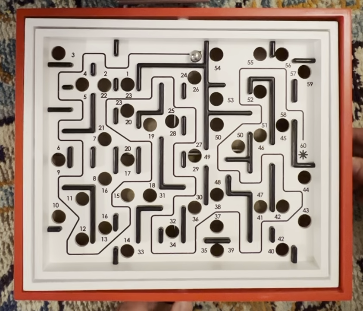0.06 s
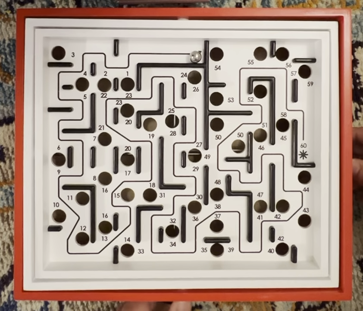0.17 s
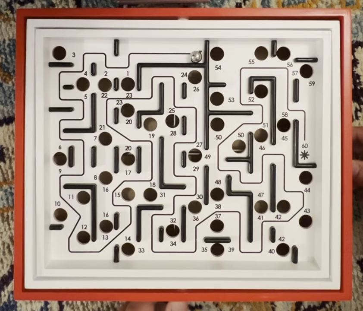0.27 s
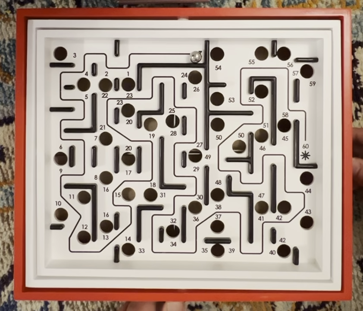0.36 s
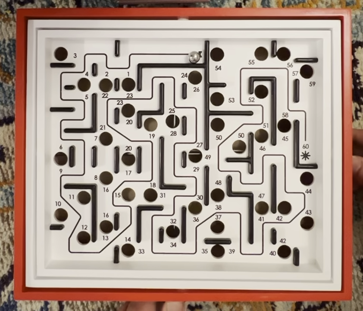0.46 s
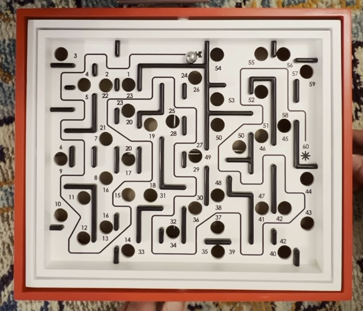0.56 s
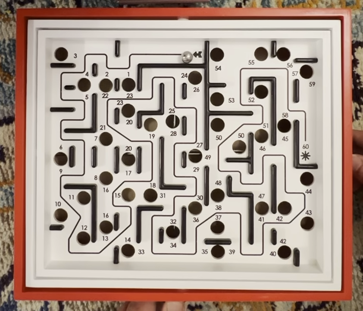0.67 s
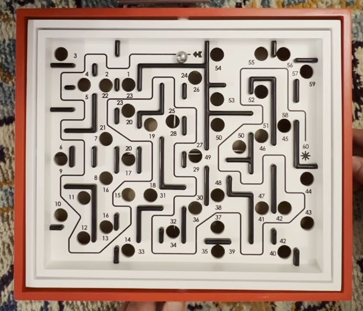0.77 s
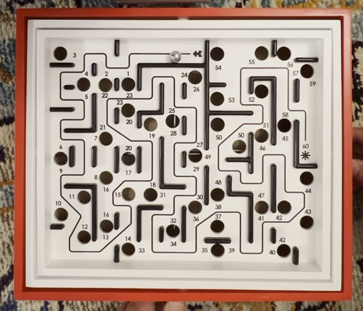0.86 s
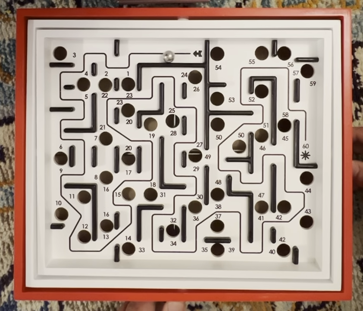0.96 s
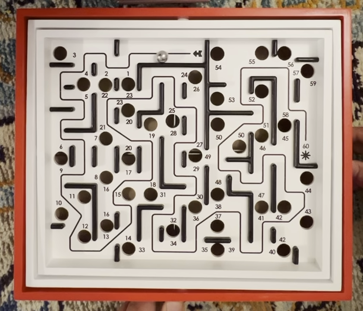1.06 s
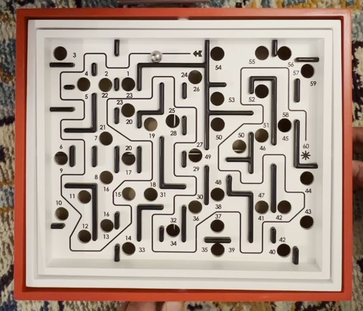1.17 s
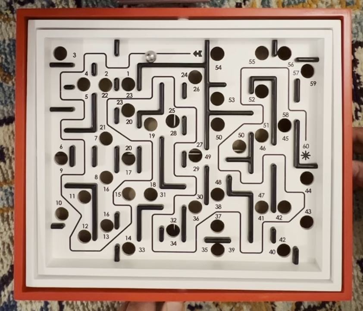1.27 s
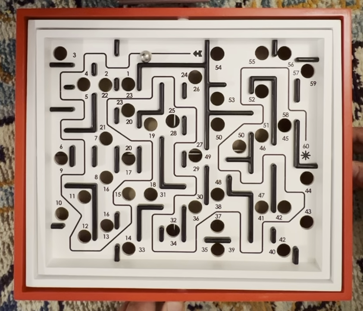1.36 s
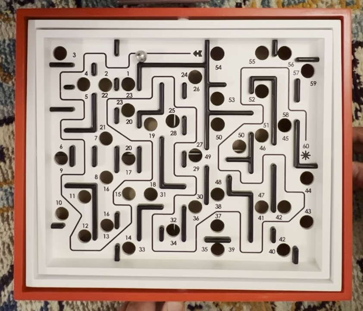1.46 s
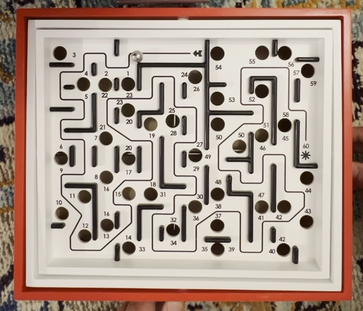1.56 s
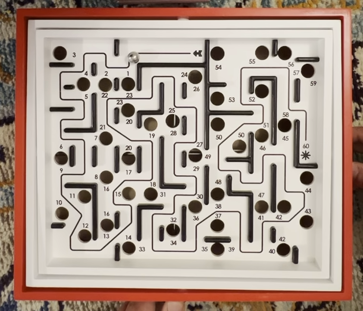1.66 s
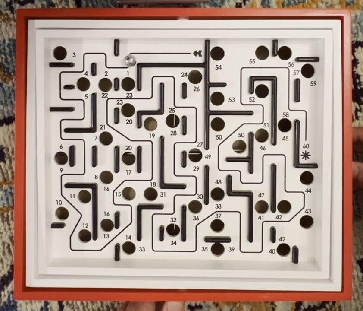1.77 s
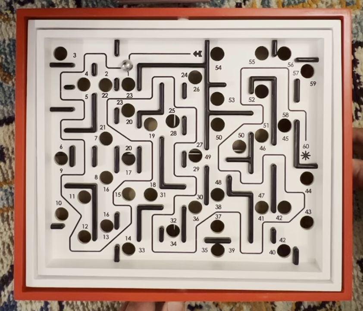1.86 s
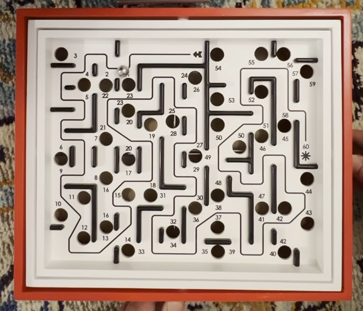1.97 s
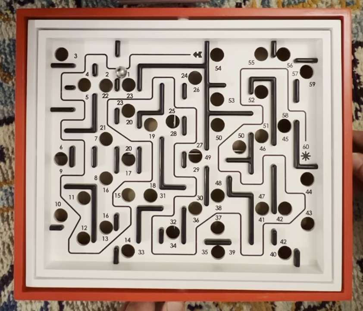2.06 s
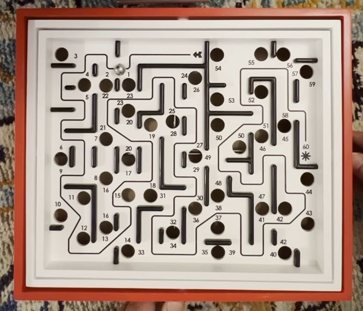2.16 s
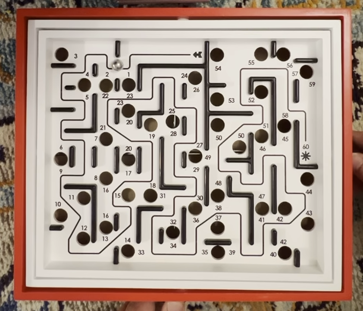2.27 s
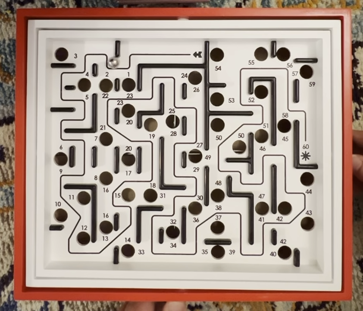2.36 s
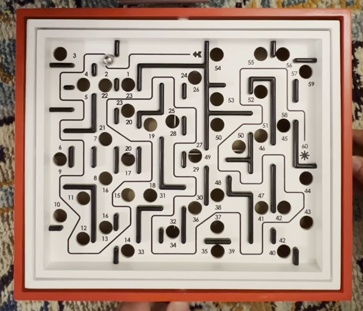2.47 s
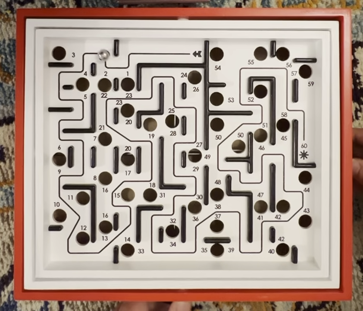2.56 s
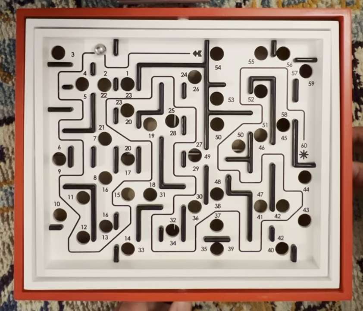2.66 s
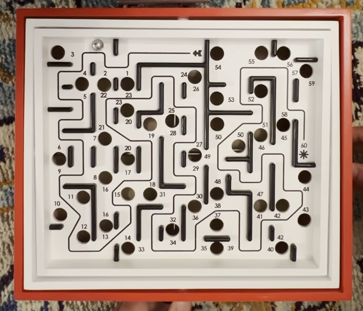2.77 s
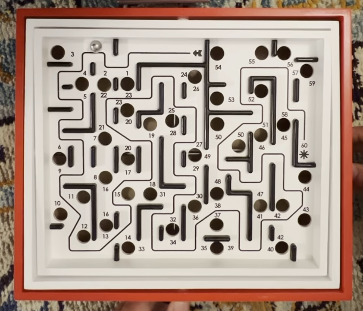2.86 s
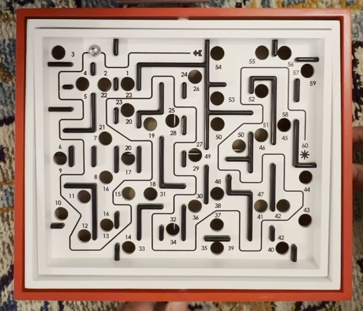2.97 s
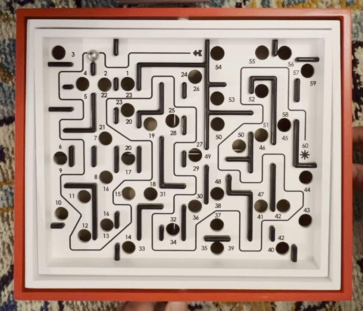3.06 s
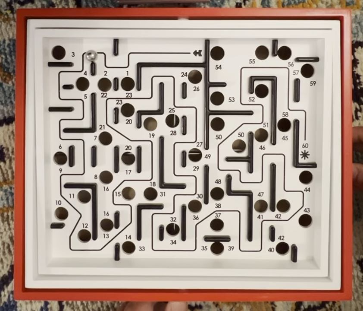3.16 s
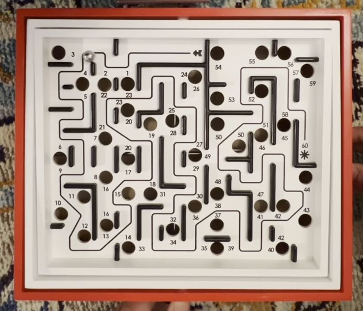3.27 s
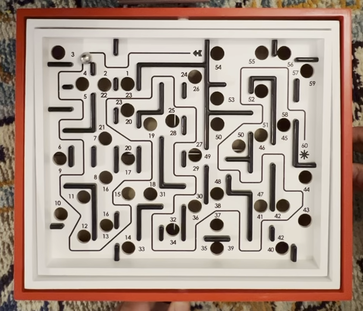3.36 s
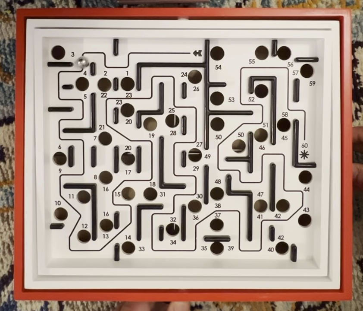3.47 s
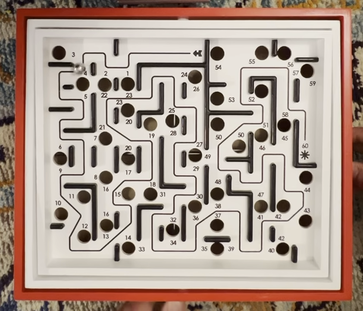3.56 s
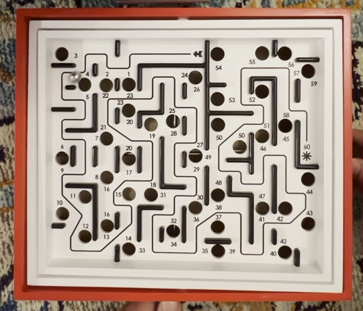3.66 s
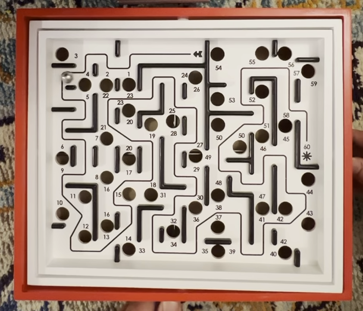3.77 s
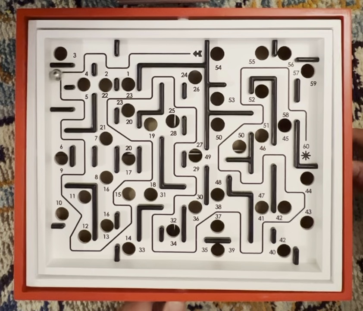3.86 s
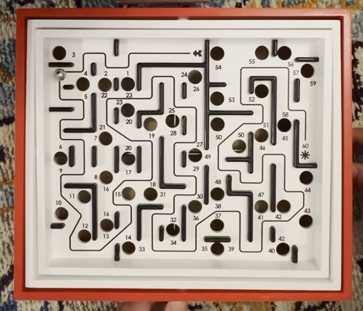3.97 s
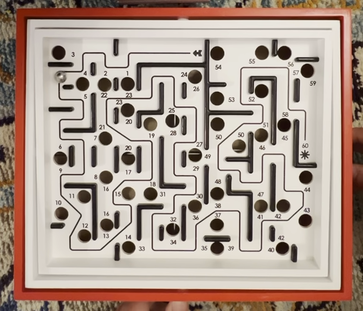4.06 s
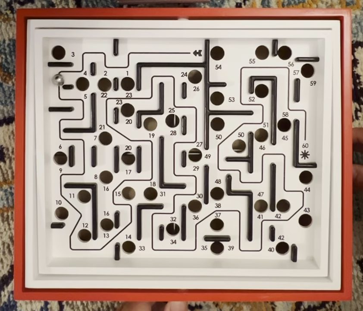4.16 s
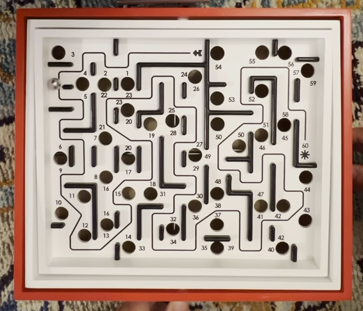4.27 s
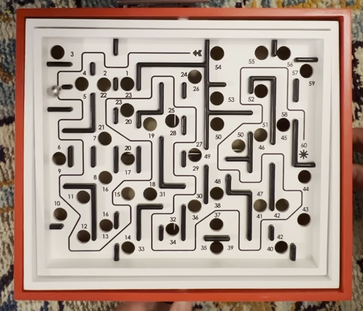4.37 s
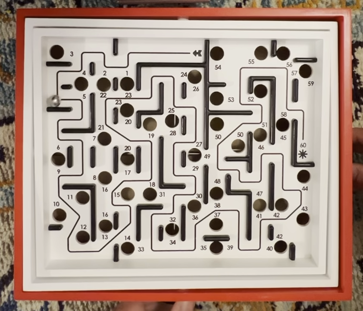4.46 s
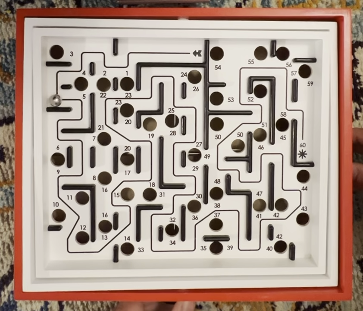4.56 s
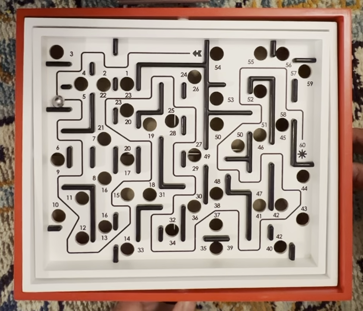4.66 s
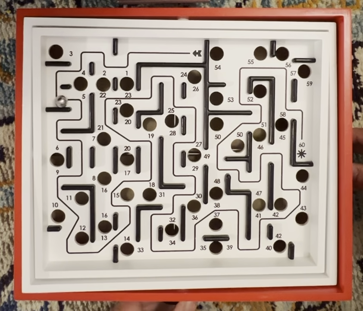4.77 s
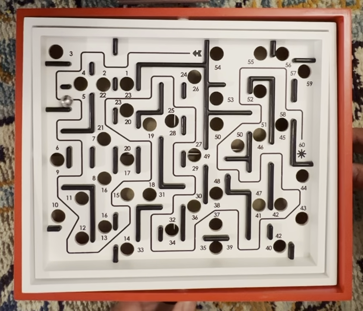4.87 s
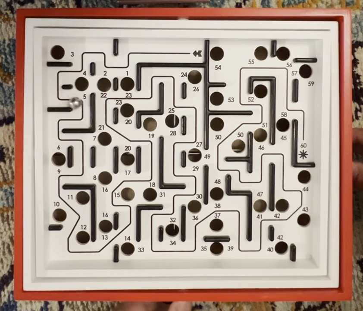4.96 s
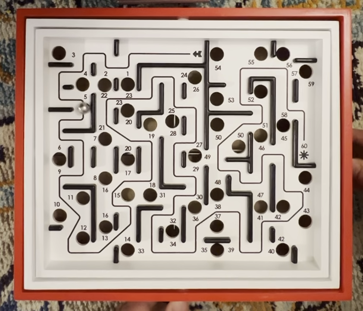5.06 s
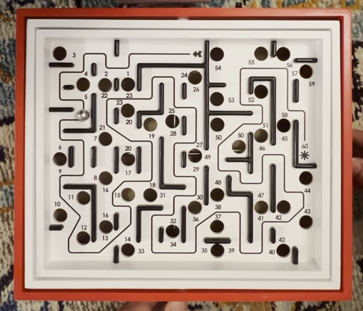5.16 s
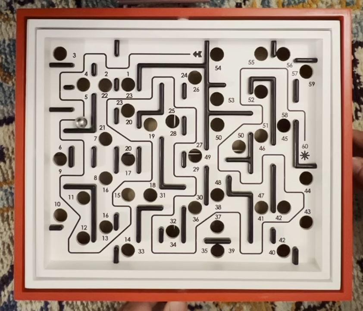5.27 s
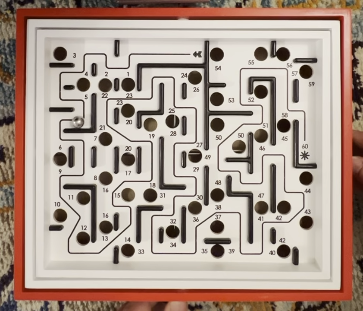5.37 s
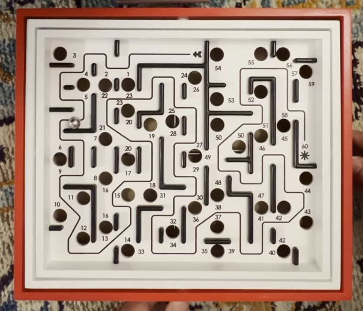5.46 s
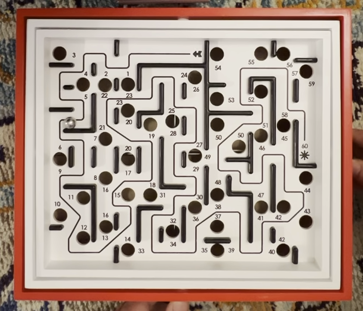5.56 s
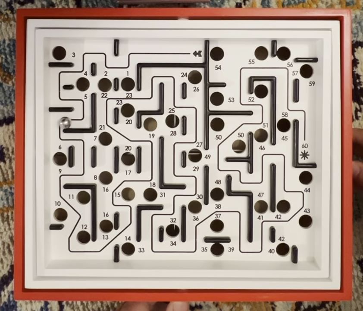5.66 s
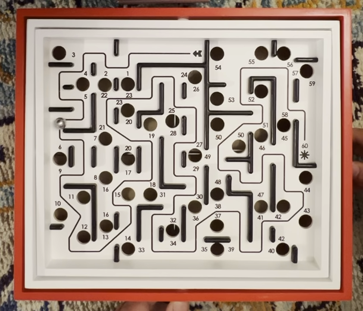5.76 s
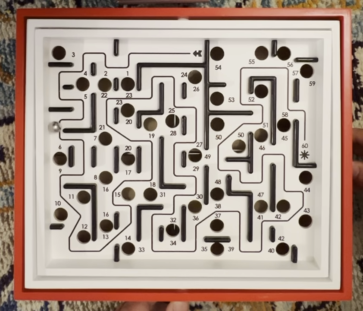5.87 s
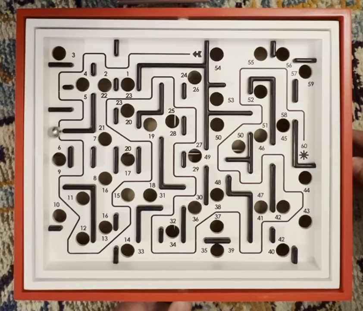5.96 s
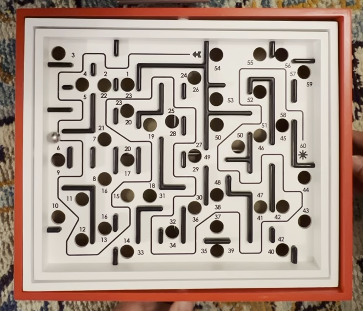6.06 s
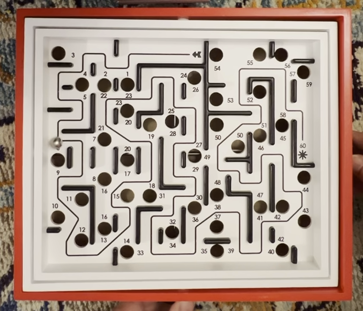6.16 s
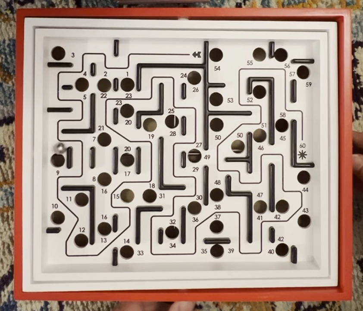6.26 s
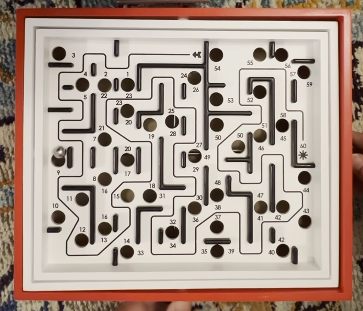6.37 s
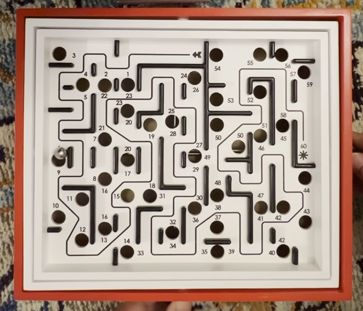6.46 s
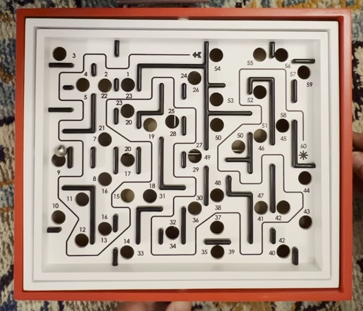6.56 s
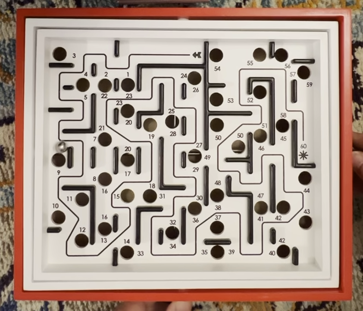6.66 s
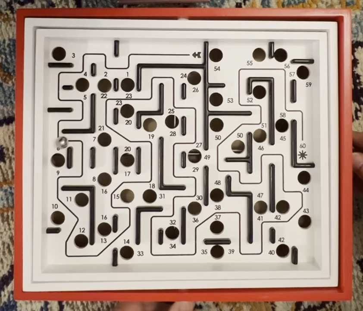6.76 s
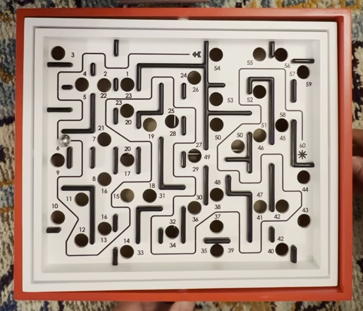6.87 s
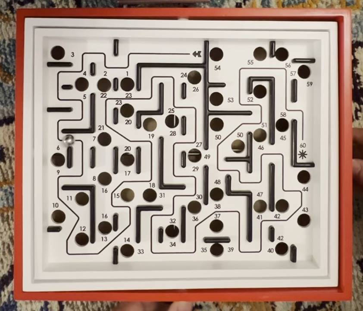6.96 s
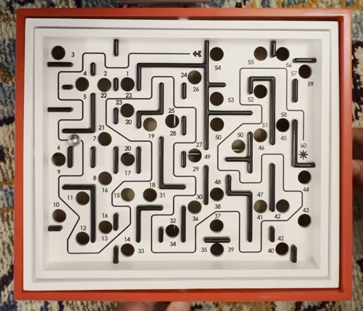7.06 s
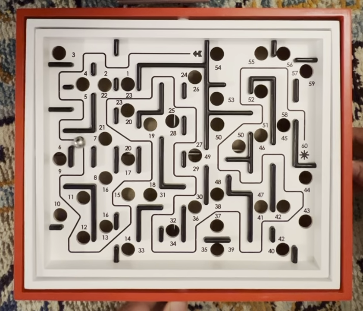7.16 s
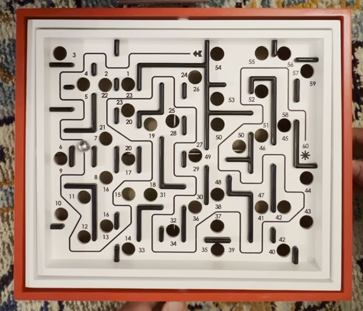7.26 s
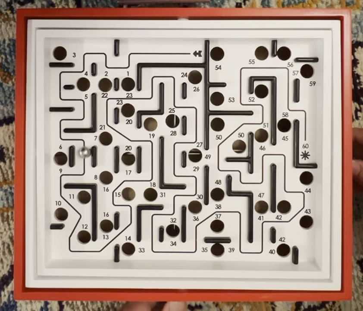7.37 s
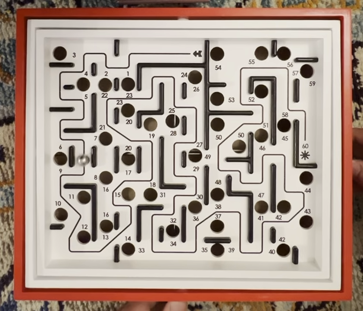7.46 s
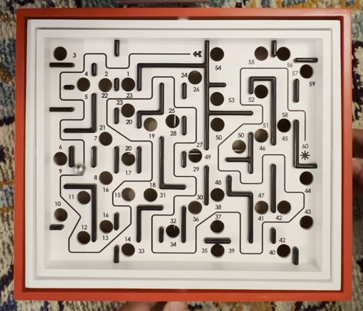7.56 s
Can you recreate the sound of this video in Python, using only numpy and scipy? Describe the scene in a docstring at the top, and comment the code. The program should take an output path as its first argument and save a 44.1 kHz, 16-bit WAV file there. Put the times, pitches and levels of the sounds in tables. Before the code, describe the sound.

A metal ball makes short accelerating runs over a thin painted board, murmuring and lightly rattling, then clacks against wooden strips with brief hollow resonance. The opening is soft; the middle is busiest and loudest, with paired knocks and a few soft hops. Later, knocks are more spaced, with muffled frame thuds and pivot scrapes. Heard close up, with slight small-room reverberation over a quiet low hum.

```python
"""A steel ball rolls through a wooden labyrinth game in a small, quiet room.
Each knock on a wall excites the modes of the wall strip and the thin board; hops give soft, grainy taps.
Tiny bumps in the paint drive the same modes into a rolling murmur, with light rattling taps on top.
The tilting frames thump dully in their hollow box, heard as filtered noise bursts over box modes.
Diffuse reflections surround the game; coloured noise and a low wavering hum lie underneath."""
import sys
import numpy as np
from scipy import signal
from scipy.fft import rfft, irfft
from scipy.io import wavfile

SR = 44100
rng = np.random.default_rng(int(sys.argv[2]) if len(sys.argv) > 2 else 0)


def output_pcm(signal):
    """Save a mono or channel-first signal as 16-bit PCM at the path in sys.argv[1].

    Samples are clipped to [-1, 1] before scaling.
    """
    pcm = np.clip(np.atleast_2d(signal).T, -1, 1) * 32767
    wavfile.write(sys.argv[1], SR, np.round(pcm).astype(np.int16))


N = 335160
TIME = np.arange(N) / SR
RING_TIME = np.arange(5 * 2 ** 12) / SR

# Event levels are nominal: the functions add fixed offsets to them. Spectra and mode levels are relative.
# Ball against wall: (time [s], wall level [dB], board level [dB], favoured low board mode [Hz],
# favoured upper board mode [Hz], wall pitch [Hz], clack over shared wall ring [dB], contact tick level [dB])
WALL_KNOCKS = [(0.198, -51, -41.5, 631.5, 1085, 1453, -10, -67),
               (0.756, -77.5, -49.5, 630, 1070, 1770, 2, -88.5), (2.041, -32, -31, 701, 1093, 1710, 0, -47),
               (2.342, -31.5, -38, 665, 979, 1680, -3, -45.5),
               (2.815, -45, -44.5, 696, 986, 1716, 19, -66.5),
               (3.082, -35, -31.5, 618, 1018, 1911, -11, -42.5),
               (3.727, -30, -33, 596, 860, 2300, -0.5, -38.5),
               (3.737, -38, -33.5, 618, 1140, 2020, 2, -45.5), (3.887, -27, -34, 460, 1080, 2040, 13, -40),
               (4.153, -41, -36.5, 620, 857, 2000, -5, -53.5),
               (4.281, -36.5, -39, 454, 1070, 2033, 13, -44.5),
               (4.49, -33, -29, 528, 1143, 2110, -1.5, -41), (4.504, -32.5, -32, 550, 1000, 1550, 8, -36),
               (4.65, -46.5, -40.5, 530, 1142, 1580, -3, -62), (5.102, -30, -34, 428, 1157, 1660, -9, -46),
               (5.289, -29.5, -29, 430, 1154, 1900, 2, -44), (5.477, -47, -42, 405, 1055, 1930, 5.5, -70),
               (5.888, -50.5, -35.5, 445, 1055, 2000, 14, -59.5),
               (5.942, -41.5, -36.5, 544, 1000, 1680, -6, -55),
               (6.305, -38.5, -32.5, 426, 1092, 1690, -6, -48.5),
               (6.49, -47, -44.5, 453, 1125, 1911, -4, -65), (6.85, -37, -34, 546, 979, 1610, 2, -49.5),
               (6.949, -46, -43.5, 428, 1128, 1930, 0.5, -66.5)]
# Soft, dull taps: the ball hopping over a flaw in the paint or meeting a wall lightly: (time [s], level [dB])
SOFT_TAPS = [(0.28, -41.5), (0.339, -48), (0.862, -41.5), (0.943, -46.5), (1.06, -51), (1.838, -44),
             (1.885, -44.5), (1.933, -56), (3.185, -28), (3.612, -34), (4.697, -41), (4.829, -51),
             (4.919, -52), (6.027, -33), (6.605, -39), (7.371, -38.5), (7.521, -37)]
# Runs down the tilted board: (start [s], end [s], level at full speed [dB],
# board mode favoured along the way [Hz], rattle over murmur [dB])
BALL_RUNS = [(0.103, 0.262, -61.5, 534, -28), (.68, 0.967, -58.5, 624, -16.5), (.97, 1.16, -61, 540, -11),
             (1.287, 1.51, -65, 538, -16), (1.683, 1.8, -57.5, 562, -15.5), (1.792, 1.97, -56, 544, -5.5),
             (2.286, 2.648, -55, 486, -14.5), (2.6, 2.73, -61, 647, -15), (2.926, 3.11, -57, 440, -10),
             (3.429, 3.64, -47.5, 585, -14), (3.619, 3.833, -49.5, 618, -5),
             (4.053, 4.497, -45.5, 520, -18), (4.719, 5.1, -50.5, 449, -14), (5.095, 5.235, -52, 443, -3),
             (5.361, 5.905, -58.5, 528, -17), (6.0, 6.26, -55, 554, -30), (6.586, 6.8, -55.5, 542, -20),
             (6.855, 7.097, -54.5, 485, -23), (7.229, 7.56, -49, 440, -9.5)]
# Frame shifting in the box: (time [s], thud level [dB], thud pitch [Hz], boom level [dB], scrape level [dB])
FRAME_THUMPS = [(1.25, -50, 310, -59, -52.5), (1.705, -54.5, 380, -62, -85),
                (2.506, -52.5, 368, -57, -58.5), (2.972, -44, 373, -44, -61),
                (3.384, -39, 457, -50.5, -57.5), (3.657, -43, 384, -47.5, -56),
                (5.441, -41, 432, -46.5, -53.5), (5.535, -49, 117, -50.5, -55),
                (5.996, -55.5, 447, -54, -66), (6.52, -49.5, 400, -54.5, -64),
                (6.888, -46, 166, -50, -55.5), (6.997, -39, 250, -51, -48.5), (7.288, -39, 250, -45, -54.5)]
# Modes of the thin board: (frequency [Hz], level [dB], nominal t60 [s])
BOARD_MODES = [(388.9, -8, 0.49), (442.2, 2, 0.17), (462.6, 2, 0.077), (534.8, -8, 0.069), (553, 3, 0.11),
               (620.3, -1, 0.15), (691, -3, 0.097), (750, -13.5, 0.051), (811, -9.5, 0.13),
               (873.7, -3.5, 0.13), (974, -3.5, 0.13), (1049, -3.5, 0.12), (1126, -1.5, 0.1),
               (1182.4, -5, 0.094), (1298, -8.5, 0.12), (1390, -6.5, 0.15)]
# Modes of the wall strips: (frequency [Hz], level [dB], nominal t60 [s])
WALL_MODES = [(1559, -4.5, 0.057), (1619, 2.5, 0.04), (1743, -0.5, 0.031), (1909, -1.5, 0.076),
              (1955, -4.5, 0.035), (2125, 5, 0.023), (2221, -7.5, 0.028), (2767, -5, 0.026),
              (3050, -18.5, 0.028)]
# Modes of the hollow box: (frequency [Hz], level [dB], t60 [s])
BOX_MODES = [(73.9, 2, 0.29), (91.1, -3, 0.4), (115.4, 0.5, 0.29), (155.6, -11.5, 0.48)]
# Spectrum of the dense, grainy wood response: (frequency [Hz], level [dB])
GRAIN_SPECTRUM = [(150, -25), (300, -6), (430, 6), (1200, 1), (2100, -7.5), (2450, -13), (3000, -14),
                  (4300, -23), (6000, -49.5)]
# Spectrum of the hard contact tick: (frequency [Hz], level [dB])
TICK_SPECTRUM = [(1200, -26.5), (2400, 4), (2900, 4.5), (3500, -5), (4100, -0.5), (5000, -5), (7000, -6),
                 (9000, -18.5), (12000, -22), (15500, -38.5)]
# Spectrum of the frame's wooden thud: (frequency [Hz], level [dB])
THUD_SPECTRUM = [(60, -45), (130, -7), (200, 0), (290, -6.5), (380, -1), (560, -9.5), (800, -13.5),
                 (1100, -20.5), (2000, -35), (3000, -63)]
# Spectrum of the scraping pivots: (frequency [Hz], level [dB])
SCRAPE_SPECTRUM = [(1200, 19), (2500, 12.5), (3700, 9), (6000, 1.5), (9000, 0.5), (11000, -26.5),
                   (15000, -58)]
# Filter of the soft rolling contact: (frequency [Hz], gain [dB])
CONTACT_FILTER = [(150, -13.5), (400, -4), (560, 1), (750, -4.5), (1100, -10), (1900, -9), (2800, -14),
                  (9000, -30.5)]
# Filter of the rattling taps: (frequency [Hz], gain [dB])
RATTLE_FILTER = [(300, -27), (600, -2), (1000, 3.5), (1700, -5), (2200, -11), (5000, -31.5)]
# Filter of a soft landing, which barely reaches the treble: (frequency [Hz], gain [dB])
LANDING_FILTER = [(1200, -1), (2000, -5), (3000, -7.5)]
# Spectrum of the still air: (frequency [Hz], level [dB])
AIR_SPECTRUM = [(15, -30.5), (35, -22.5), (75, -6.5), (130, -12), (170, -18), (500, -28.5), (800, -34),
                (1700, -40), (3000, -46.5), (6500, -48.5), (10000, -58), (15500, -64.5)]
# Low hum: (frequency [Hz], mean level [dB])
HUM_TONES = [(35.5, -64), (70, -61.5), (119, -65)]

AIR_DB, HUM_WAVER_DB = -64, 2
TOP_HZ = 15750  # upper limit of the recorder
JOLT_DB = -2.5  # first jolt, relative to the nominal thud
# the frame drops back onto its pivots after each jolt; levels relative to the nominal thud and boom
SETTLE_S, SETTLE_THUD_DB, SETTLE_BOOM_DB = .034, -6.5, 4.5
BOX_SCATTER_DB = 3
COAST_S = .14  # time constant of the ball's slowing after a run
BUMPS_PER_S = 600
NODE_SWING_DB, PLACE_LIFT_DB = 6, 12
PLACE_WIDTH = .1  # in natural-log frequency
PATTER_T60_S, PATTER_DB = .05, -11  # level relative to the modal part
RATTLES_PER_S, RATTLE_SCATTER_DB = 70, 4
CRACK_DB, BENDING_DB = -24, -10  # relative to the nominal wall ring; to the nominal board ring
UPPER_LIFT_DB, GRAIN_DB, TICK_RIPPLE_DB = 10, -9, 3.5


def undb(db):
    """Level in decibels as an amplitude ratio."""
    return 10 ** (np.asarray(db) / 20)


def unit(x):
    """Normalisation to an rms value of 1."""
    return x / np.sqrt(np.mean(x ** 2))


def blow(x, db):
    """Energy normalisation: a decaying sound gets the energy of 30 ms at the given level."""
    return x * undb(db) / np.sqrt(np.sum(x ** 2) / (2 * .03 * SR))


def add(track, sound, s):
    """Superposition of a sound on the track from time s."""
    start = int(s * SR)
    track[:, start:start + sound.shape[1]] += sound[:, :N - start]


def pan(x, db):
    """Level difference between the ears: left louder than right by db."""
    return x * undb(np.array([[db], [-db]]) / 2)


def colour(x, points):
    """Linear filtering by a gain curve interpolated on a log-frequency axis."""
    hz, db = np.transpose(points)
    f = np.maximum(np.fft.rfftfreq(x.shape[-1], 1 / SR), 1)
    gain = undb(np.interp(np.log(f), np.log(hz), db))
    return irfft(rfft(x) * gain, x.shape[-1])


def noise(points, side_db, size):
    """Partial coherence: coloured noise shared by both ears plus an opposed side part."""
    mid, side = rng.standard_normal((2, size))
    opposed = side * np.array([[1], [-1]])
    return unit(colour(mid + undb(min(side_db, -1)) * opposed, points))


def walk(rate):
    """Slow random fluctuation: Gaussian values, rate per second, joined by straight lines."""
    count = int(rate * N / SR) + 2
    return np.interp(TIME, np.linspace(0, N / SR, count), rng.standard_normal(count))


def nearness(hz, centre_hz, width):
    """Resonance-like bell on the log-frequency axis, 1 at the centre."""
    return np.exp(-(np.log(hz / centre_hz) / width) ** 2)


def fade(t60):
    """Exponential decay by 60 dB in t60 seconds."""
    return np.exp(-np.log(1000) * RING_TIME / t60)


def swell(rise_s):
    """Exponential build-up of a vibration with time constant rise_s."""
    return 1 - np.exp(-RING_TIME / rise_s)


def burst(points, t60, rise_s, side_db):
    """High modal density: countless close modes, struck together, act as decaying noise."""
    return noise(points, side_db, size=len(RING_TIME)) * fade(t60) * swell(rise_s)


def ring(modes, scatter_db, spread):
    """Modal superposition: the blow's position sets each size and sign; each ear has its own phase."""
    out = np.zeros((2, len(RING_TIME)))
    for hz, db, t60 in modes:
        size, sign, detune, ear = rng.standard_normal(4)
        t = RING_TIME[:int(t60 * SR)]
        mode_hz = hz * (1 + .005 * detune)
        wave = np.exp((2j * np.pi * mode_hz - np.log(1000) / t60) * t)
        ears = np.exp(1j * spread * ear * np.array([[1], [-1]]))
        gain = np.sign(sign) * undb(db + scatter_db * size)
        out[:, :len(t)] += gain * (ears * wave).imag
    return out


def room_tone():
    """Stationary background: coloured noise of still air and hum tones wavering in level and phase."""
    hum = 0
    for hz, db in HUM_TONES:
        level = undb(db + HUM_WAVER_DB * walk(25)) * np.sqrt(2)
        hum = hum + level * np.sin(2 * np.pi * hz * TIME + 2.6 * walk(3.8))
    air = noise(AIR_SPECTRUM, side_db=-1, size=N) * undb(AIR_DB)
    return pan(hum + air, db=1.5)


def reverb(x, t60, wet_db):
    """Diffuse reverberation of a small furnished room: convolution with decaying, dulled noise."""
    absorption = [(100, -9), (500, 4), (3000, -1.5), (7500, -4.5), (11000, -13.5)]  # (Hz, dB)
    tail = colour(rng.standard_normal((2, len(RING_TIME))), absorption)
    # silent for 1.3 ms, then rising over the next 1.3 ms
    tail = tail * fade(t60) * np.clip(RING_TIME / .0013 - 1, 0, 1)
    tail = tail * undb(wet_db) / np.sqrt(np.sum(tail[0] ** 2))
    return signal.fftconvolve(x, tail, axes=1)[:, :N]


def box_boom(spread, rise_s, db):
    """Cavity resonance: the hollow box answers the frame in its few low modes."""
    modes = ring(BOX_MODES, scatter_db=BOX_SCATTER_DB, spread=spread)
    return blow(modes * swell(rise_s), db)


def thumps():
    """Soft impact and friction: frames thud and judder, the box booms, pivots slip and scrape, frames settle."""
    out = np.zeros((2, N))
    for s, thud_db, thud_hz, boom_db, scrape_db in FRAME_THUMPS:
        wood = [(f, db + 5 * nearness(f, thud_hz, width=.32)) for f, db in THUD_SPECTRUM]
        jolt = blow(burst(wood, t60=.084, rise_s=.0022, side_db=-17.5), thud_db + JOLT_DB)
        stutter = undb(1.5 * walk(90)[:len(RING_TIME)])
        judder = blow(burst(wood, t60=.63, rise_s=.027, side_db=-11.5) * stutter, thud_db - 1.5)
        boom = box_boom(spread=.065, rise_s=.0097, db=boom_db + 6)
        slip = blow(burst(GRAIN_SPECTRUM, t60=.028, rise_s=.0029, side_db=1), scrape_db - 2)
        scrape = blow(burst(SCRAPE_SPECTRUM, t60=.39, rise_s=.002, side_db=-2), scrape_db - 7.5)
        settle = blow(burst(wood, t60=.15, rise_s=.0018, side_db=-10), thud_db + SETTLE_THUD_DB)
        settle = settle + box_boom(spread=.06, rise_s=.017, db=boom_db + SETTLE_BOOM_DB)
        add(out, pan(jolt + judder + boom, db=1), s)
        add(out, slip + scrape, s + .0053)
        add(out, pan(settle, db=1.5), s + SETTLE_S)
    return out


def motion():
    """Uniform acceleration in each run, then exponential slowing; gives loudness, favoured mode and rattle."""
    t = TIME[::100]  # the motion is slow enough for a coarse grid
    start, end, db, hz, rattle_db = np.transpose(BALL_RUNS)[:, :, None]
    gathering = np.clip((t - start) / (end - start), 0, 1)
    speed = gathering * np.exp(-np.maximum(t - end, 0) / COAST_S)
    gains = undb(db) * speed + 1e-9  # loudness is proportional to speed
    share = gains / gains.sum(axis=0)
    curves = gains.max(axis=0), (hz * share).sum(axis=0), (rattle_db * share).sum(axis=0)
    return [np.interp(TIME, t, curve) for curve in curves]


def rattle():
    """Random impact train: on rough paint the ball skips in light, dry taps that briefly ring the strips."""
    scatter_db = RATTLE_SCATTER_DB * np.clip(rng.standard_normal(N), -2, 2)
    taps = (rng.random(N) < RATTLES_PER_S / SR) * undb(scatter_db)
    strips = unit(ring(WALL_MODES[1:3], scatter_db=5, spread=.5))
    dry_tap = unit(burst(GRAIN_SPECTRUM, t60=.04, rise_s=.0005, side_db=1))
    train = signal.fftconvolve(taps[None], .5 * strips + dry_tap, axes=1)[:, :N]
    return unit(colour(train, RATTLE_FILTER))


def rolling():
    """Roughness excitation: paint bumps drive modes that swell and shrink as the ball crosses their nodes."""
    loudness, place_hz, rattle_db = motion()
    bumps = rng.standard_normal(N) * (rng.random(N) < BUMPS_PER_S / SR)
    bumps = bumps * undb(4 * np.tanh(walk(30)))  # smooth and rough patches of paint
    modal = 0
    for hz, db, t60 in BOARD_MODES + WALL_MODES:
        # the resting weight damps the modes: t60 is shortened to nine tenths
        pole = np.exp((2j * np.pi * hz - np.log(1000) / (.9 * t60)) / SR)
        node_db = NODE_SWING_DB * np.tanh(walk(10))
        place_db = PLACE_LIFT_DB * nearness(hz, place_hz, PLACE_WIDTH)
        mode = signal.lfilter([1], [1, -pole], bumps) * undb(db + node_db + place_db)
        ears = np.exp(.45j * rng.standard_normal() * np.array([[1], [-1]]))
        modal = modal + (mode * ears).imag
    # every bump also gives a short, dry patter
    tap = burst(GRAIN_SPECTRUM, t60=PATTER_T60_S, rise_s=.0013, side_db=2.5)
    patter = signal.fftconvolve(bumps[None], tap, axes=1)[:, :N]
    # a rolling contact is soft, so it feeds the low modes most
    murmur = unit(colour(unit(modal) + undb(PATTER_DB) * unit(patter), CONTACT_FILTER))
    return (murmur + undb(rattle_db) * rattle()) * loudness


def rebound(x, gap_s, db):
    """Repeated contact: the ball chatters, with a weaker copy after 0.5 to 1.5 times gap_s."""
    lag = int(gap_s * SR * (.5 + rng.random()))
    return x + undb(db) * np.pad(x, ((0, 0), (lag, 0)))[:, :x.shape[1]]


def favour(modes, hz, lift_db):
    """Antinode excitation: modes near hz have an antinode under the ball and answer more strongly."""
    return [(f, db + lift_db * nearness(f, hz, width=.035), t60) for f, db, t60 in modes]


def ripple(points, depth_db):
    """Position-dependent excitation: each spot on the wood gives random peaks and dips over the spectrum."""
    hz, db = np.transpose(points)
    grid = np.geomspace(hz[0], hz[-1], 32)
    smooth_db = np.interp(np.log(grid), np.log(hz), db)
    return list(zip(grid, smooth_db + depth_db * rng.standard_normal(len(grid))))


def hop(db):
    """Soft impact: a landing or lightly knocking ball excites the modes with a dull, grainy tap of little
    treble."""
    modes = unit(ring(BOARD_MODES + WALL_MODES[:3], scatter_db=4, spread=.96) * swell(.0009))
    grain = unit(burst(GRAIN_SPECTRUM, t60=.054, rise_s=.001, side_db=-9)) * undb(-2)
    tap = rebound(modes + grain, gap_s=.0076, db=-13.5)
    return blow(colour(tap, LANDING_FILTER), db - 16.5)


def knock(wall_db, board_db, board_hz, upper_hz, wall_hz, clack_db, tick_db):
    """Hard impact: steel ticks on the strip, the strip rings briefly, and the board takes up the blow."""
    # the board's broad, low modes build up slowly
    low_modes = favour(BOARD_MODES[:7], board_hz, lift_db=19.5)
    bending = ring(low_modes, scatter_db=6.5, spread=.28)
    deep = blow(bending * swell(.0076), board_db + BENDING_DB)
    upper_modes = favour(BOARD_MODES[7:], upper_hz, lift_db=UPPER_LIFT_DB)
    upper = ring(upper_modes, scatter_db=3.5, spread=.67)
    board = blow(upper * swell(.00054), board_db - 7.5)
    # the strip's own well-damped clack joins the modes that it shares with its neighbours
    shared = unit(ring(WALL_MODES, scatter_db=0, spread=.18))
    clack = unit(ring([(wall_hz, 0, .018)], scatter_db=0, spread=.11)) * undb(clack_db)
    wall = blow((shared + clack) * swell(.0011), wall_db - 5.5)
    crack = blow(burst(GRAIN_SPECTRUM, t60=.0026, rise_s=.00024, side_db=-15.5), wall_db + CRACK_DB)
    # a hard, brief contact reaches the high modes, a soft one does not
    hardness_db = tick_db - wall_db + 23
    dense = [(f, db + .39 * hardness_db * (f > 2300) + 3 * nearness(f, wall_hz, width=.13))
             for f, db in GRAIN_SPECTRUM]
    grain = blow(burst(dense, t60=.12, rise_s=.0066, side_db=-5.5), (board_db + wall_db) / 2 + GRAIN_DB)
    spot = ripple(TICK_SPECTRUM, depth_db=TICK_RIPPLE_DB)
    contact = burst(spot, t60=.036, rise_s=.00051, side_db=-2)
    tick = blow(rebound(contact, gap_s=.012, db=-14.5), tick_db - 3.5)
    return deep + board + wall + crack + grain + tick


def knocks():
    """Impulsive excitation: the ball meets the walls, hard or lightly, and hops over flaws in the paint."""
    out = np.zeros((2, N))
    for s, *contact in WALL_KNOCKS:
        add(out, knock(*contact), s)
    for s, db in SOFT_TAPS:
        add(out, hop(db), s)
    return out


def scene():
    """Direct and diffuse sound: the game lies below the microphone, a little nearer to its right port."""
    game = thumps() + rolling() + knocks()
    left, right = game + reverb(game, t60=.44, wet_db=-14.5)
    return room_tone() + np.array([np.roll(left, 1), right])  # left arrives one sample later


def record(dry):
    """Band limitation: the recorder cuts the top with a steep low-pass filter."""
    low_pass = signal.ellip(8, .2, 70, TOP_HZ, fs=SR, output="sos")
    return signal.sosfilt(low_pass, dry)


dry = scene()
out = record(dry)
output_pcm(out)
```